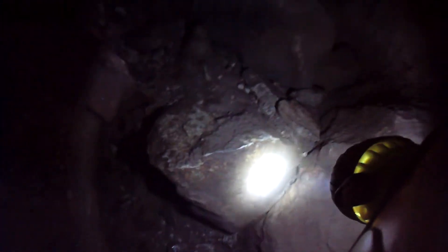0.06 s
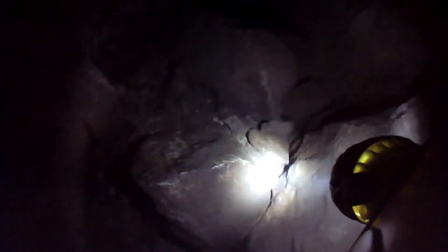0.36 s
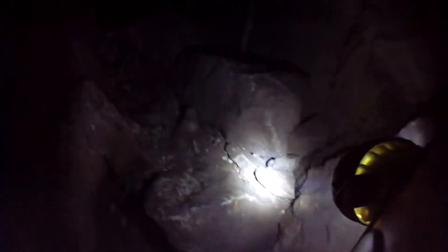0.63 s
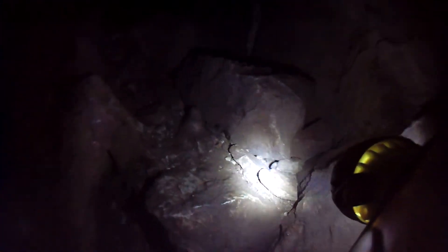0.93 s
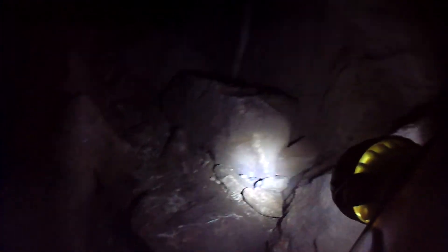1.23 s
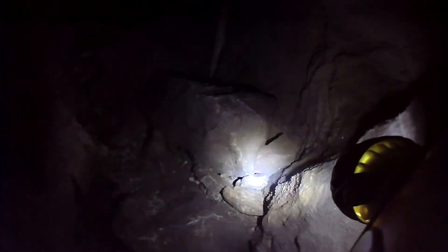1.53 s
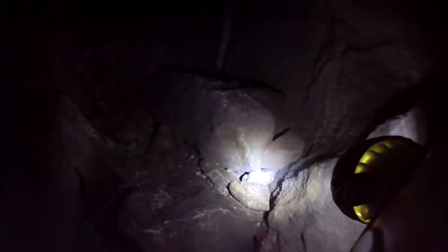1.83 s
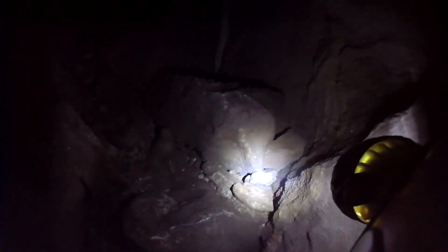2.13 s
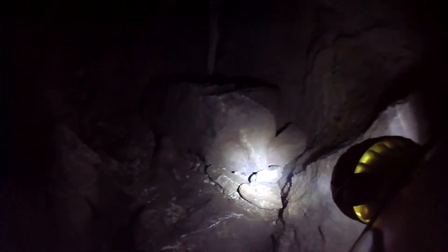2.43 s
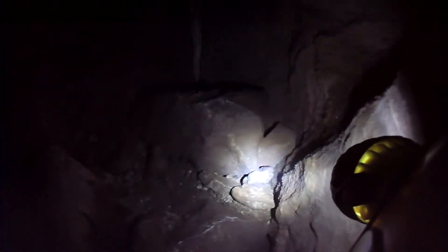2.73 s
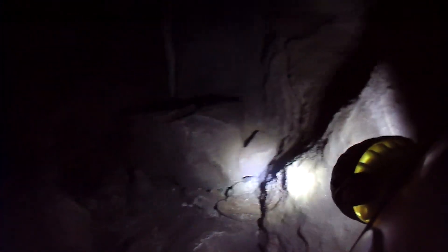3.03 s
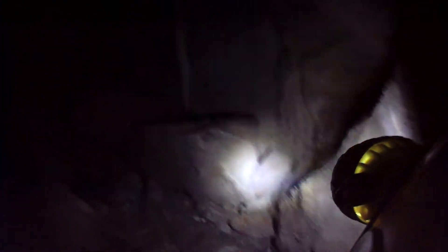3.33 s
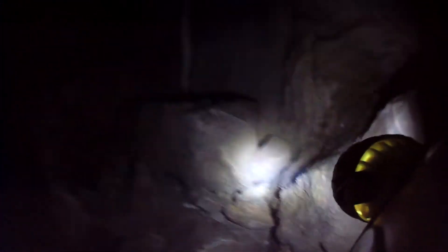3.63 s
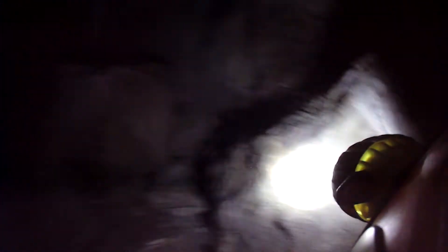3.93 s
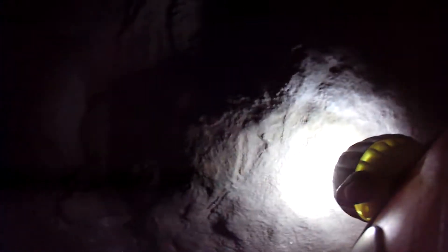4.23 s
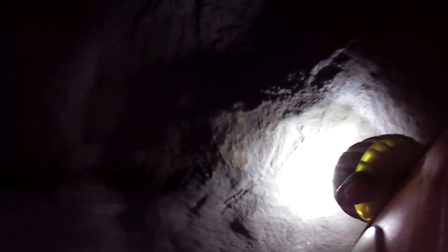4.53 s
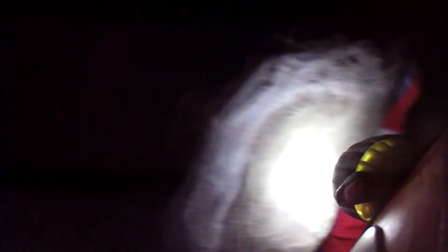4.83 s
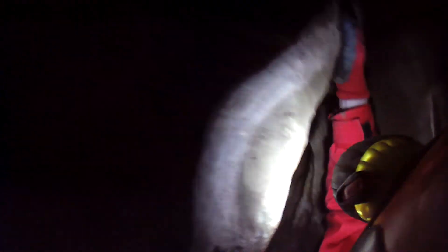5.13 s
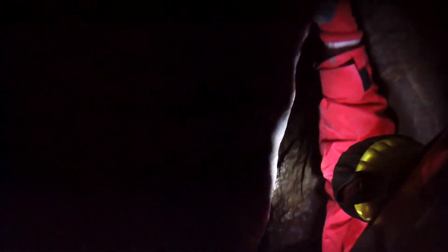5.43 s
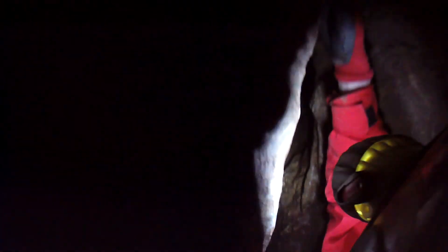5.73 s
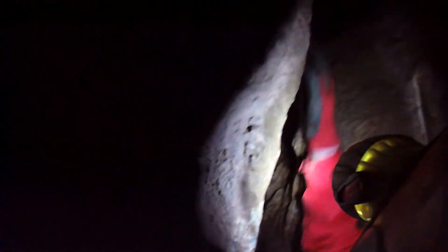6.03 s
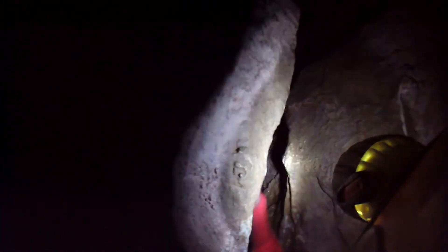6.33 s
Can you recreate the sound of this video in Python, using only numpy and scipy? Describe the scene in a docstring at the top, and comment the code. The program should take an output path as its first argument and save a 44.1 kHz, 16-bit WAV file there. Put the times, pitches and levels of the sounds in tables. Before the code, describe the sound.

A caver's helmet bumps and grinds against rock in a tight passage, right at the microphone. One loud, overloaded crack with a deep thump comes near the start, followed by small ticks and scrapes. Several more clusters of hollow clacks, short rasps and thuds follow, with a very faint metallic ring after the hardest. The knocks then die away, leaving soft suit rustle. There is almost no echo.

```python
"""A caver in a tight passage

A helmet and its camera housing knock and grind on rock: impact and stick-slip friction excite their
resonances, so close to the microphone that the hardest blows overload it. Each shove flexes the housing
with a deep thump, a metal fitting rings faintly, and the suit rustles in between."""
import sys
import numpy as np
from scipy import signal
from scipy.fft import rfft, irfft
from scipy.io import wavfile
from scipy.ndimage import uniform_filter1d

SR = 44100
rng = np.random.default_rng(int(sys.argv[2]) if len(sys.argv) > 2 else 0)


def output_pcm(signal):
    """Save a mono or channel-first signal as 16-bit PCM at the path in sys.argv[1].

    Samples are clipped to [-1, 1] before scaling.
    """
    pcm = np.clip(np.atleast_2d(signal).T, -1, 1) * 32767
    wavfile.write(sys.argv[1], SR, np.round(pcm).astype(np.int16))


N = 280917

# Knocks on rock: t/s, peak level/dB, f/Hz of the spot struck, body/dB and grit/dB re housing
IMPACTS = [ (0.2705, -2, 1084, -1, -6), (0.2745, -2, 900, -7, -5), (0.364, -40, 1820, 2, -5),
           (0.397, -44, 1440, 1, -1), (0.441, -45, 1850, -3, -11), (0.4945, -27, 1447, -2, -15),
           (0.584, -20.5, 1417, -7, -35), (0.5862, -17, 1800, -17, -23), (0.627, -38, 1890, -8, -17),
           (0.686, -34.5, 1910, -3, -18), (0.707, -41, 1684, -2, -9), (0.768, -38, 1770, -12, -14),
           (0.784, -35, 1670, 3, -17), (0.851, -52, 1460, 8, 3), (0.877, -49, 1810, -5, -4),
           (0.956, -45.5, 1524, -1, -11), (1.377, -49, 1940, 3, -8), (1.62, -15.8, 1591, -7, -10),
           (1.6712, -35, 1630, 6, -12), (2.1354, -18, 1600, -6, -8), (2.2495, -25, 1530, -12, -8),
           (2.3045, -43, 1450, 7, -9), (2.37, -48, 1515, 5, -7), (2.4365, -41, 1915, 10.5, -14),
           (2.448, -31, 1800, -20, -8), (2.4527, -20.5, 1810, -10, -13), (2.4846, -25, 1825, -7, -14),
           (2.5272, -15.5, 1753, -16, -38), (3.3437, -21.5, 1590, -2, -8), (3.351, -26, 1660, -5, -20),
           (3.383, -28.5, 2050, -22, -8), (3.407, -27.5, 1600, -14, -14), (3.439, -24, 1480, -12, -19),
           (3.482, -18, 2114, -6, -6), (3.486, -16, 1740, -4, -28), (3.978, -33, 1730, -3, -11),
           (4.023, -39, 1730, 6, -12), (4.0374, -33, 1600, -7, -12), (4.068, -49, 1790, 0, -5),
           (4.102, -52, 1660, -1, -9), (4.151, -54, 1660, 0, -18), (4.356, -46, 1730, -14, -9),
           (5.235, -64, 1710, -10, -6)]
# Scrapes: start t/s, end t/s, start level/dB, end level/dB, housing f/Hz, body/dB re housing
DRAGS = [ (0.276, 0.302, -14, -35, 1750, -1), (0.300, 0.339, -30.5, -26, 1680, -9),
         (0.333, 0.503, -51.5, -58.5, 1750, -3), (0.567, 0.724, -40, -53, 1850, -4),
         (0.952, 1.016, -56, -62.5, 1556, -2), (1.377, 1.44, -62, -67, 1850, -3),
         (1.62, 1.664, -34, -65, 1706, -6), (2.133, 2.158, -35, -48, 1630, 4),
         (2.195, 2.255, -58, -34, 1600, 2), (2.47, 2.535, -44, -32.5, 1920, -12),
         (3.347, 3.445, -33, -43, 1680, -7), (3.488, 3.545, -40, -29, 1880, -6),
         (3.976, 4.018, -46, -70, 1730, 10), (4.043, 4.169, -63, -72, 1690, 7),
         (4.38, 4.459, -60, -70, 1740, -7)]
# Shoves that flex the housing: t/s, level/dB, f/Hz, level/dB of the hollow's ring
SHOVES = [ (0.2691, -5.5, 33.6, -40), (0.281, -14, 153, -40), (0.502, -24, 26, -55), (0.722, -32, 14, -65),
          (0.7765, -19.5, 46, -40), (1.375, -25, 185, -36), (1.399, -29.5, 54, -55),
          (1.622, -18.5, 17, -42), (1.624, -27, 100, -45), (1.685, -24, 16, -60), (2.137, -17.5, 16, -30),
          (2.249, -28, 200, -25), (2.303, -24, 23, -42), (2.44, -25, 19.5, -38), (2.573, -25, 166, -38),
          (2.59, -31, 42, -55), (3.345, -20, 51, -40), (3.482, -15, 21, -34), (3.498, -19.5, 110, -40),
          (3.976, -23, 147, -24), (4.0195, -14.5, 88, -21), (4.03, -28, 30, -55), (4.065, -35, 150, -31),
          (4.094, -24, 105, -36), (4.145, -33, 135, -42), (4.398, -38, 145, -50), (4.412, -47, 310, -56)]
# Spectra of a contact's dull body, housing resonance and sharp grit: f/Hz, relative level/dB
BODY_SPECTRUM = [(20, -11.5), (60, 7.5), (150, 2), (260, -1), (380, -6), (500, -6.5), (700, -9),
                 (900, -7.5), (1100, -6.5), (1600, -30), (6000, -92)]
HOUSING_SPECTRUM = [(200, -48.5), (600, -29), (950, -12.5), (1200, -14.5), (1430, 0), (1800, 2), (2030, -3),
                    (2250, -18), (3000, -25.5), (5000, -58.5), (10000, -88)]
GRIT_SPECTRUM = [(1000, -33.5), (2000, -12), (2450, 4), (3000, 3.5), (3500, -2), (3900, -11.5),
                 (4350, -10.5), (4900, -18), (5500, -18.5), (7400, -20), (8300, -34), (14000, -48)]
# Narrow resonances of the camera housing: f/Hz, half-width/Hz, gain/dB
SHELL_MODES = [(877, 15, 3.5), (1200, 12, 4.5), (1614, 100, 2), (2487, 56, 4), (2821, 65, 5.5),
               (3080, 110, 2.5), (3320, 40, 3), (3471, 42, 1), (3960, 60, 7.5), (4270, 45, 5.5),
               (4450, 50, 4.5), (5100, 45, 7)]
# Modes of the housing's hollow: f/Hz, relative level/dB, decay time/s
CAVITY_MODES = [(225, 0, .009), (330, -9, .011)]
# Modes of the metal fitting: f/Hz, relative level/dB, T60/s
FITTING_MODES = [(395, -3, 2.5), (1222, -1.5, 2.8), (1448, -3.5, 2.4), (2130, 0.5, .85), (1610, 8, 0.46),
                 (2622, -3.5, 1), (2901, -10, 1.1)]
# Blows that reach the fitting: t/s, level/dB, extra gain/dB of its fourth mode
FITTING_BLOWS = [(0.272, -70, -3), (1.622, -74.5, -1), (2.137, -73.5, 8.5), (2.526, -75.5, 3.5),
                 (3.484, -75, 16.5)]
# Slides of the suit: t/s when fastest, rise/s and fall/s per 10 dB, rustle level/dB, rumble level/dB
SUIT_SLIDES = [ (0.33, .26, .3, -70, -69), (0.7, .2, .19, -72, -58), (1.075, .13, .08, -64, -85),
               (1.42, .07, .1, -68, -66), (2.06, .35, .18, -63.3, -86), (2.5, .13, .115, -60.5, -60),
               (2.98, .12, .05, -92, -63), (3.42, .1, .35, -66, -68), (4.2, .2, .08, -85, -65),
               (4.42, .07, .085, -71, -59), (4.8, .1, .08, -74.5, -71), (5.05, .08, .12, -77, -82),
               (5.93, .15, .08, -79, -85), (6.16, .06, .18, -71, -85)]
# Spectra of fabric rustle and swish, rumble of leaning and steady background: f/Hz, relative level/dB
RUSTLE_SPECTRUM = [(300, -19.5), (900, -16), (1300, -8), (1700, 4.5), (2150, -7), (2600, 0), (3000, -2.5),
                   (3600, -15.5), (6000, -43.5)]
SWISH_SPECTRUM = [(1500, -30.5), (3000, 3.5), (5000, 1.5), (7000, -7), (10000, -17), (12000, -28.5),
                  (15000, -44)]
RUMBLE_SPECTRUM = [(20, -9), (80, -3.5), (175, 4), (260, -11.5), (450, -22.5), (900, -34.5), (2000, -52),
                   (8000, -89)]
AIR_SPECTRUM = [(20, 5.5), (31, 4.5), (50, -4), (80, -9), (173, -19.5), (400, -27), (1040, -36),
                (1400, -36), (1710, -24.5), (2140, -44.5), (2600, -34), (3820, -44), (11500, -49.5),
                (12500, -62)]

FIRM_DB = -24  # level of a firm contact; lighter ones sound duller


def knocks(contact_s=.0017, linger_s_per_db=.00012, rise_s=.00096, lead_s=.00041, tone_db=-2, trim_db=-2):
    """Impact: a force pulse rings the spot struck and crushes grit; a light blow stays in contact longer."""
    out, t = np.zeros(N), np.arange(2048) / SR
    for s, db, hz, body_db, grit_db in IMPACTS:
        decay = contact_s + linger_s_per_db * max(FIRM_DB - db, 0)
        blow = (1 - np.exp(-t / rise_s)) * np.exp(-t / decay)
        rough_force = blow * rng.choice([-1, 1], len(t))
        clack, thud = contact(rough_force, db, hz, body_db, grit_db)
        tone = np.pad(blow * np.sin(2 * np.pi * hz * t), (0, len(clack) - len(t)))
        clack = clack + amp(tone_db) * unit_rms(tone)
        peak_rms = np.sqrt(uniform_filter1d(clack ** 2, 88).max())  # loudest 2 ms
        add(out, s - lead_s, amp(db) * (clack + amp(trim_db) * thud) / peak_rms)
    return out


def scrapes(grains_per_s=5000, grain_db=3.3, judder_db=1.3, judder_hz=220,
            snags_per_s=45, snag_force=.9, snag_s=.002):
    """Stick-slip friction: rock grains catch and let go in a juddering train, with random larger snags."""
    out = np.zeros(N)
    for start, end, start_db, end_db, hz, body_db in DRAGS:
        n = round((end - start) * SR)
        pressure = amp(np.linspace(start_db, end_db, n)) * signal.windows.tukey(n, .12)
        caught = rng.random(SR)[:n] < grains_per_s / SR
        sizes = rng.standard_normal(SR)[:n]
        judder = wander(SR, judder_hz)[:n]
        snag_onsets = rng.random(SR)[:n] < snags_per_s / SR
        snags = signal.lfilter([snag_force], [1, -np.exp(-1 / (snag_s * SR))], snag_onsets)
        grains = caught * np.sign(sizes) * amp(grain_db * abs(sizes) + judder_db * judder)
        force = grains * pressure * (1 + snags)
        rasp, thud = contact(force, max(start_db, end_db), hz, body_db, grit_db=-13, dulling=.9)
        add(out, start, (rasp + thud) * np.linalg.norm(pressure) / np.linalg.norm(rasp))
    return out


def contact(force, db, hz, body_db, grit_db, dulling=1.0, dull_hz=4200):
    """Forced vibration: one force gives a bright part (housing and grit) and a dull part (body)."""
    housing = shell(force, lambda f: level_at(HOUSING_SPECTRUM, f) + resonance(f, hz, width_hz=110, db=6))
    body = shell(force, lambda f: level_at(BODY_SPECTRUM, f))
    loss_db = dulling * max(FIRM_DB - db, 0)  # a light touch loses the treble of its grit
    grit = shell(force, lambda f: level_at(GRIT_SPECTRUM, f) - loss_db * f ** 4 / (f ** 4 + dull_hz ** 4))
    return housing + amp(grit_db) * grit, amp(body_db) * body


def shell(force, spectrum_db):
    """Resonant filtering: the camera housing's modes add peaks to a spectrum, in a minimum-phase response."""
    f = abs(np.fft.fftfreq(2048, 1 / SR))
    modes_db = sum(resonance(f, *mode) for mode in SHELL_MODES)
    log_gain = np.log(amp(spectrum_db(f) + modes_db))
    transfer = np.exp(np.conj(signal.hilbert(log_gain)))
    return unit_rms(signal.fftconvolve(force, np.fft.ifft(transfer).real))


def thumps(decay_at_100hz_s=.0135, release_db=-15.5, release_db_per_db=.7):
    """Elastic recoil: a shove flexes the housing and rings its hollow; it springs back as a scrape ends."""
    out = np.zeros(N)
    for s, db, hz, cavity_db in SHOVES:
        add(out, s, flex(db, hz, decay_at_100hz_s * (100 / hz) ** .72))  # slow swings last longer
        for mode_hz, mode_db, decay_s in CAVITY_MODES:
            add(out, s, flex(cavity_db + mode_db, mode_hz, decay_s))
    for _, end, _, end_db, _, _ in DRAGS:
        recoil_db = release_db + release_db_per_db * (end_db - FIRM_DB)
        add(out, end, flex(recoil_db, hz=8, decay_s=.03))
    return out


def flex(db, hz, decay_s, rise_s=.003, grip_decays=1.8):
    """Damped oscillation: the dented housing swings back, pumping air, until the rock grips it."""
    t = np.arange(SR // 2) / SR
    damping = np.exp(-t / decay_s - (t / (grip_decays * decay_s)) ** 4)
    swing = np.sin(2 * np.pi * hz * t + np.pi / 6) * damping
    return -amp(db) * swing * (1 - np.exp(-t / rise_s))


def fitting():
    """Free vibration: the modes of a small metal part on the helmet ring on after hard blows."""
    out, t = np.zeros(N), np.arange(2 * SR) / SR
    for s, blow_db, extra_db in FITTING_BLOWS:
        for k, (hz, mode_db, t60) in enumerate(FITTING_MODES):
            struck_db = blow_db + mode_db + extra_db * (k == 3)
            add(out, s, amp(struck_db - 60 * t / t60) * np.sin(2 * np.pi * hz * t))
    return out


def suit(flutter_db=1.9, flutter_hz=60, crinkle_db=-1.0, crinkle_hz=1200, brisk_db=-65, rounding=.15):
    """Friction noise: sliding fabric swells and fades in uneven catches, over a rumble of leaning."""
    t = np.arange(N) / SR
    rustle_db, rumble_db = -92, -82  # the caver is never quite still
    for s, rise, fall, slide_db, lean_db in SUIT_SLIDES:
        from_peak = np.maximum((s - t) / rise, (t - s) / fall)
        swell_db = -10 * (np.hypot(from_peak, rounding) - rounding)
        rustle_db = np.maximum(rustle_db, slide_db + swell_db)
        rumble_db = np.maximum(rumble_db, lean_db + swell_db)
    swish_db = rustle_db - 11 + .35 * (rustle_db - brisk_db)  # swish grows faster than rustle
    catches = amp(flutter_db * wander(N, flutter_hz) + crinkle_db * wander(N, crinkle_hz))
    fabric = amp(rustle_db) * noise(RUSTLE_SPECTRUM) + amp(swish_db) * noise(SWISH_SPECTRUM)
    return fabric * catches + amp(rumble_db) * noise(RUMBLE_SPECTRUM)


def passage(x, wet_db=-27, t60=.1):
    """Reverberation: reflections from close rock walls add a faint, short tail."""
    t = np.arange(SR // 2) / SR
    tail = rng.standard_normal(len(t)) * amp(-60 * t / t60)
    return x + amp(wet_db) * signal.fftconvolve(x, tail / np.linalg.norm(tail))[:N]


def noise(spectrum):
    """Spectral shaping: white noise takes on the given colour, at unit rms."""
    gain = amp(level_at(spectrum, np.fft.rfftfreq(N, 1 / SR)))
    return unit_rms(irfft(rfft(rng.standard_normal(N)) * gain, N))


def resonance(f, hz, width_hz, db):
    """A Lorentzian peak in dB, at half its height width_hz either side of hz."""
    return db / (1 + ((f - hz) / width_hz) ** 2)


def wander(n, rate_hz):
    """Random modulation: straight lines join Gaussian values drawn at the given rate."""
    return np.interp(np.arange(n) * rate_hz / SR, np.arange(n), rng.standard_normal(n))


def level_at(spectrum, hz):
    """Level in dB, interpolated on a log-frequency axis."""
    f, db = np.transpose(spectrum)
    return np.interp(np.log(hz + 1), np.log(f + 1), db)


def amp(db):
    """Decibels to amplitude ratio."""
    return 10 ** (np.asarray(db) / 20)


def unit_rms(x):
    """Normalisation to an rms of 1."""
    return x / np.sqrt(np.mean(x ** 2) + 1e-20)


def add(mix, s, sound):
    """Superposition of a sound on the mix, from time s."""
    part = mix[max(round(s * SR), 0):][:len(sound)]
    part += sound[:len(part)]


def scene(air_db=-61.5):
    """Superposition: all sources sum at one microphone, over a steady background."""
    contacts = passage(knocks() + scrapes())
    return (contacts + thumps() + fitting() + suit() + amp(air_db) * noise(AIR_SPECTRUM))[None]


def record(dry, ceiling=.23, cutoff_hz=14550):
    """Saturation: the overloaded microphone flattens the peaks; a low-pass then limits the band."""
    clipped = dry / (1 + (dry / ceiling) ** 12) ** (1 / 12)
    lowpass = signal.firwin(255, cutoff_hz, window=("kaiser", 8), fs=SR)
    return signal.oaconvolve(clipped, lowpass[None], "same")


dry = scene()
out = record(dry)
output_pcm(out)
```